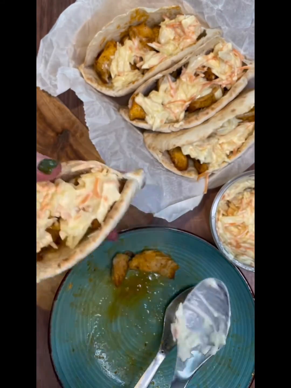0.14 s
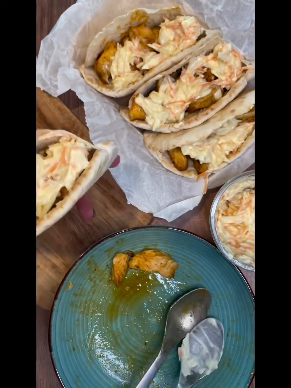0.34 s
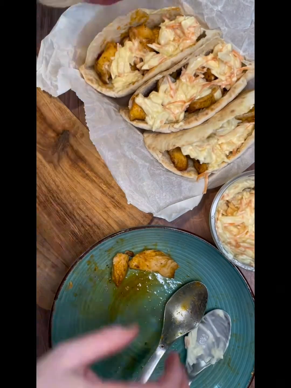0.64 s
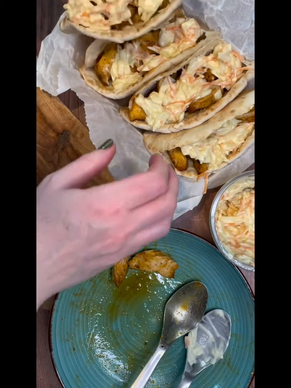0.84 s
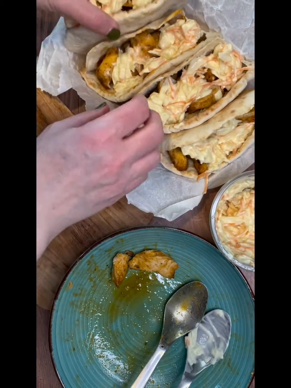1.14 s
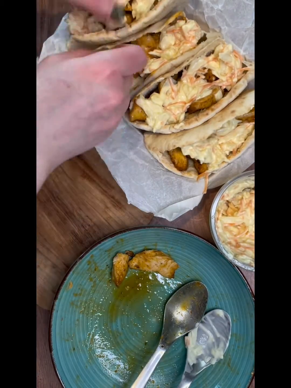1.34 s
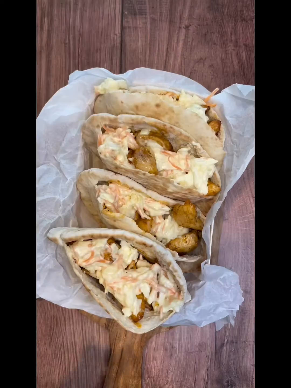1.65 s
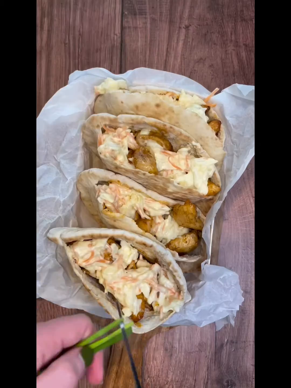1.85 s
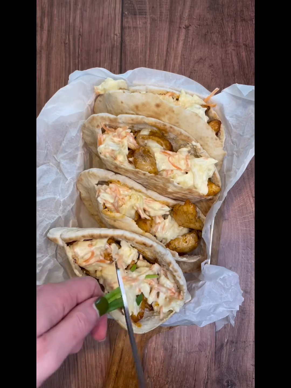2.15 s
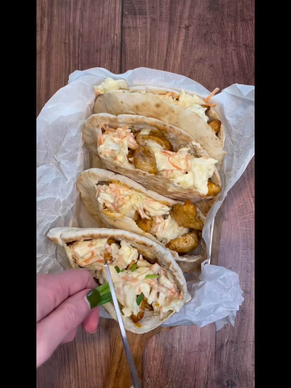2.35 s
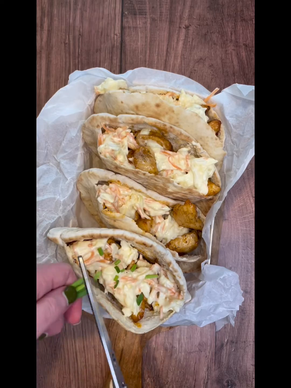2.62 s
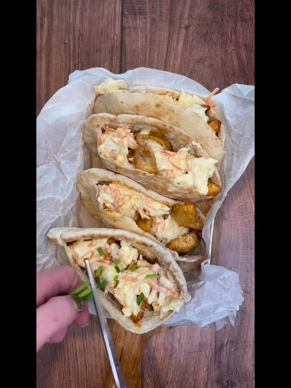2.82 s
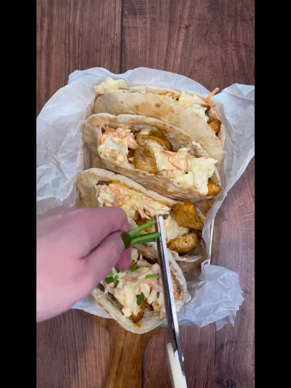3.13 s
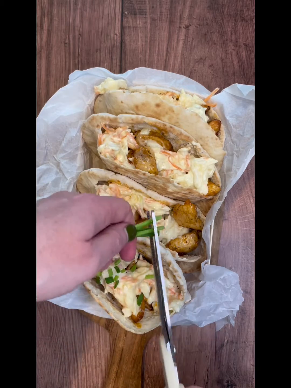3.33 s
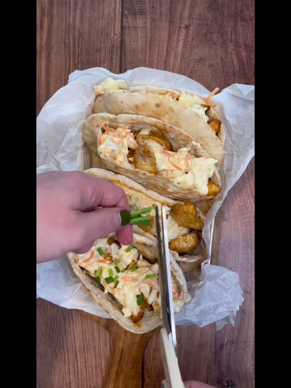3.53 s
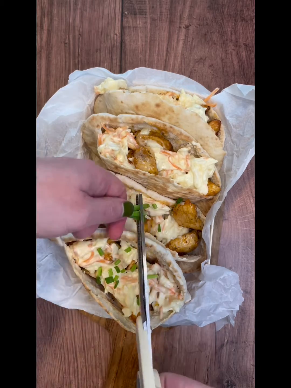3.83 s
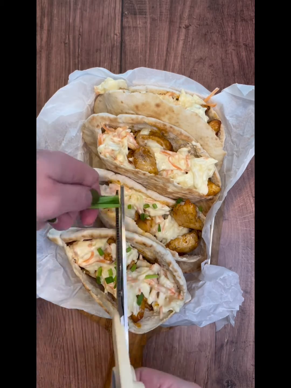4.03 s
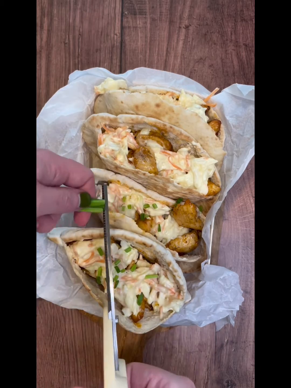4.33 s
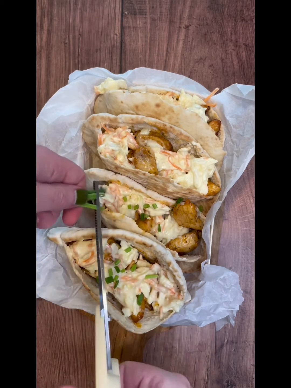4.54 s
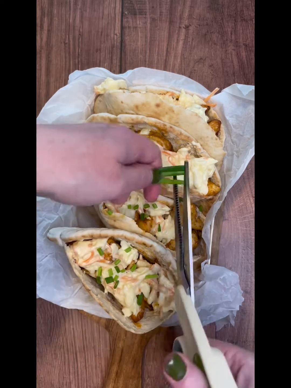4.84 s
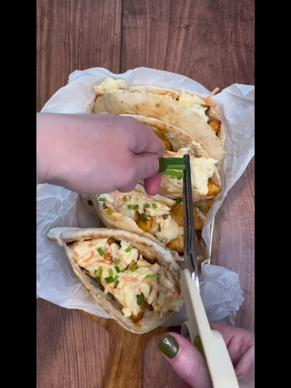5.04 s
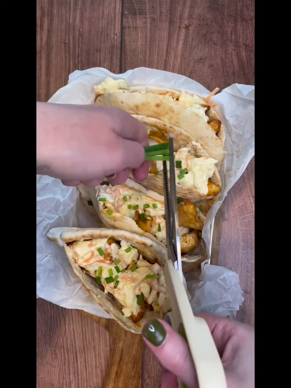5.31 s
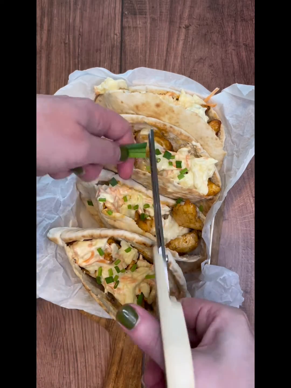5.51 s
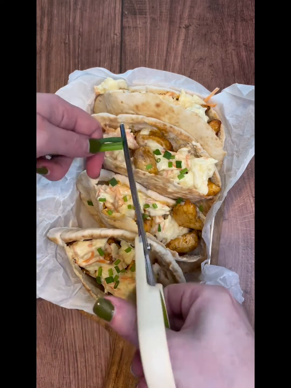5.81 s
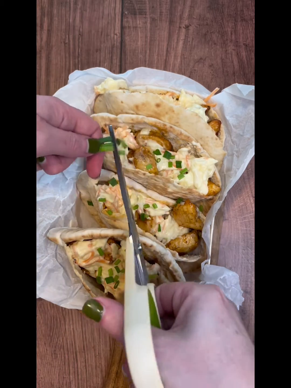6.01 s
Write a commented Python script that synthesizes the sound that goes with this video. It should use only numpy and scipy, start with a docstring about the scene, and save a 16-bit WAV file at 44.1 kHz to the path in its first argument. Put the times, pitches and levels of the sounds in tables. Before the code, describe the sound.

Close, dry stereo sound at a kitchen table. First comes a short double clink of spoon on plate, then small paper rustles and snapping creases, with light hiss behind. After a momentary drop in level, stems rustle almost inaudibly and scissors start snipping: thin blade slides, juicy little crunches, hard clacks at closure and faint dull handle knocks, irregularly spaced over quiet appliance hum.

```python
"""Kitchen table: a spoon is laid on a stoneware plate, a taco is tucked into baking paper.
The level dips briefly, chives rustle, then kitchen scissors snip them: blades slide, crunch, clack shut.
Friction is random slips, filtered for blades and paper, also driving decaying modes for ringing metal.
Sparse, shifting reflections answer; behind lie room air and appliance hum, early on a hiss and a drone."""
import sys
import numpy as np
from scipy import signal
from scipy.fft import rfft, irfft
from scipy.io import wavfile
from scipy.ndimage import uniform_filter1d

SR = 44100
rng = np.random.default_rng(int(sys.argv[2]) if len(sys.argv) > 2 else 0)


def bounce(signal):
    """Save signal as a 16-bit WAV file at the path given by the first command-line argument."""
    frames = np.transpose(np.atleast_2d(signal))
    limited = np.clip(frames, -1, 1)
    pcm = np.round(limited * 32767).astype(np.int16)
    wavfile.write(sys.argv[1], SR, pcm)


N = 272097
TIME_S = np.arange(N) / SR

# Event levels are before the mix gains in scene(); spectra are relative.
# Scissors close, louder snips bite more stems: start_s, length_s, level_db, rise_s, blade_ring_hz
SNIPS = [(1.994, 0.023, -51, 0.0094, 2270), (2.196, 0.01, -49.5, 0.0049, 2260),
         (2.381, 0.018, -46.5, 0.0072, 2340), (2.585, 0.014, -35, .008, 2420),
         (2.789, 0.022, -30, .005, 2430), (3.399, .021, -36, 0.0035, 2180),
         (3.632, 0.016, -29.5, 0.0063, 2180), (3.838, .011, -26.5, .005, 2220),
         (4.257, 0.019, -28.5, 0.0044, 2340), (4.503, 0.0067, -22, 0.0049, 2100),
         (4.964, .012, -47, 0.0043, 2100), (5.159, 0.014, -36, 0.0084, 2100),
         (5.405, 0.012, -33, .01, 2250), (5.737, 0.012, -42, 0.0059, 2230),
         (5.969, 0.018, -33, 0.0076, 2300)]
# Edge glides lightly on edge as the blades are lined up: start_s, length_s, level_db
GLIDES = [(2.748, 0.018, -67), (3.059, 0.077, -82.5), (3.368, .024, -62), (4.159, 0.03, -58),
          (4.194, 0.006, -48), (4.461, 0.034, -55), (4.81, 0.011, -77.5), (4.944, 0.019, -59.5),
          (5.592, .004, -73.5)]
# Blades catch or hit their stop: start_s, level_db, ring_hz
CLACKS = [(2.5956, -21, 2350), (3.4080, -31.5, 2320), (3.6495, -29.5, 2250), (3.8389, -31.5, 2250),
          (3.8570, -32, 2250), (4.2728, -25, 2270), (4.5200, -32, 2200), (5.1704, -21.5, 2210),
          (5.4106, -18, 2000), (5.9806, -19, 2040)]
# Scissors' distance, for partings and handle knocks: time_s, gain_db
NEARNESS = [(2.2, -3.5), (3.85, -2.5), (4.3, 4.5), (5.2, 0.5), (6.1, 2)]
# Spoon skids on the plate: start_s, length_s, level_db, rise_s, thud_share_db, treble_db
SKIDS = [(0.317, 0.021, -29.5, 0.0062, -20, 5.5), (0.3257, .0011, -18, 0.0019, -18, 1),
         (0.384, 0.017, -51, .004, 11, -10), (0.414, 0.033, -27.5, 0.0033, -9, -10)]
# Modes of spoon on stoneware: pitch_hz, level_db, t60_s
SPOON_MODES = [(303, -13.5, .1), (806, -15, .1), (980, -10.5, 0.14), (997, -19, 0.093), (2092, -2.5, 0.16),
               (2114, -7, .14), (3090, -7.5, 0.11), (4060, -9.5, .14), (4450, -10, 0.17), (5038, 4, 0.15),
               (4920, -9, .12), (6486, 3, .11), (7240, -20.5, .12), (8670, -4, 0.033), (9200, -19.5, .1),
               (10980, -10, .1), (11550, -15.5, 0.091)]
# Hand pushes the paper; the last four, faint rows are chives being handled: start_s, length_s, level_db
RUSTLES = [(0.752, 0.091, -47), (0.881, 0.071, -38.5), (1.015, .024, -43.5), (1.089, .01, -47),
           (1.14, 0.032, -47.5), (1.249, 0.015, -34), (1.453, 0.035, -58.5), (1.514, 0.0026, -39.5),
           (1.639, 0.0085, -55), (1.707, .005, -66.5), (1.802, 0.01, -73.5), (1.883, .019, -77)]
# Creases in the paper snap: start_s, level_db, treble_db
SNAPS = [(0.743, -45.5, -1), (.870, -38, -7), (0.9222, -30.5, -2.5), (1.021, -37.5, 9), (1.069, -45, -4.5),
         (1.128, -41.5, 3), (1.153, -35.5, -1.5), (1.189, -49, 11), (1.251, -32.5, 5), (1.342, -50, -9)]
# Soft knocks of a hand, the last as it squeezes the scissor handles: start_s, level_db
BUMPS = [(0.441, -45.5), (1.237, -82), (1.565, -52), (5.72, -56.5)]
# Stems being cut, spectrum: frequency_hz, level_db_per_hz
CRUNCH_SPECTRUM = [(180, -46.5), (300, -17), (1410, -23.5), (1640, -21.5), (2170, -2.5), (2650, -11),
                   (3130, -4), (3760, -12.5), (5080, -5), (5610, -7.5), (6740, -7.5), (9090, -16),
                   (10400, -7), (13500, -30), (16000, -32.5)]
# Edge sliding on edge, spectrum: frequency_hz, level_db_per_hz
SLIDE_SPECTRUM = [(410, -46.5), (700, -9.5), (946, -10), (1440, -15.5), (2240, -4.5), (2700, -7.5),
                  (4050, -5.5), (4920, 2.5), (7990, -8.5), (10700, -2), (14200, -20), (15200, -14.5),
                  (16000, -12)]
# Blade halves on their stop, spectrum: frequency_hz, level_db_per_hz
STOP_SPECTRUM = [(120, -49), (200, -15.5), (519, -16), (1320, -22), (2050, -6.5), (2330, -2), (2750, -7.5),
                 (3620, -1), (4040, -17), (5130, -1.5), (6400, -10), (6880, -7.5), (7830, -21), (10100, -7),
                 (16000, -40.5)]
# Spoon scraping over glaze, spectrum: frequency_hz, level_db_per_hz
SCRAPE_SPECTRUM = [(100, -28.5), (300, -7.5), (900, 1), (1700, 6.5), (2600, -0.5), (4500, 0), (7500, -11.5),
                   (9500, -1.5), (12000, -20.5), (15500, -18)]
# Shaken plate, spectrum: frequency_hz, level_db_per_hz
THUD_SPECTRUM = [(80, -23), (250, -2.5), (600, -9), (1000, -0.5), (1600, -5), (4000, -27.5)]
# Rustling paper and chives, spectrum: frequency_hz, level_db_per_hz
RUSTLE_SPECTRUM = [(180, -29.5), (300, -11.5), (494, -12), (565, -8.5), (1430, -5), (1660, -2.5),
                   (2930, -12), (5340, -11), (7320, -17.5), (10700, -14.5), (16000, -28.5)]
# Soft hand knock, spectrum: frequency_hz, level_db_per_hz
HAND_SPECTRUM = [(25, -13.5), (80, -1), (200, -1), (500, -14.5), (2000, -59.5)]
# Side against mid at two microphone ports, sliding blades: frequency_hz, side_db
BLADE_SIDE = [(500, -5), (2300, -7.5), (4000, 0), (5100, -13.5), (6300, 6), (7500, 6), (8600, 9),
              (9800, -4.5), (11000, -14), (14000, 7)]
# The same for clacks and handles: frequency_hz, side_db
STOP_SIDE = [(500, -13), (2300, -13), (4000, -8.5), (5100, -14), (6300, 7), (7500, 10.5), (8600, 5),
             (9800, -4), (11000, -16), (14000, 0)]
# The same for plate, rustles and soft hand knocks: frequency_hz, side_db
PLATE_SIDE = [(200, -16), (1000, -5), (3000, -2.5), (6500, -2.5), (8700, 1.5), (12000, -7)]
# Decay of the kitchen: frequency_hz, t60_s
KITCHEN_DECAY = [(250, 0.9), (1000, 0.24), (3000, 0.28), (7000, 0.29), (11000, 0.23), (16000, 0.071)]
# Colour of the reflections: frequency_hz, reflected_db
WALLS = [(250, -5), (1000, -0.5), (2200, -3.5), (3300, 3.5), (5500, -1.5), (7400, -6.5), (9000, -3),
         (15000, 2)]
# Left-right likeness of the background: frequency_hz, likeness (0 to 1)
LIKENESS = [(60, 0.87), (130, 0.94), (260, .3), (500, 0.15), (2000, 0.11), (16000, .1)]
# Room air, spectrum: frequency_hz, level_db_per_hz
AIR_SPECTRUM = [(15, -56.5), (25, -25.5), (117, -2), (212, -4.5), (277, -12), (439, -13.5), (714, -33.5),
                (1520, -37.5), (1790, -55), (1940, -45.5), (4250, -47.5), (5730, -46.5), (7110, -69),
                (7920, -63), (16000, -60.5)]
# Low room resonances stirred by the appliance: pitch_hz, level_db, width_hz
ROOM_RESONANCES = [(140.8, -69, 15), (185.5, -67, 60), (346, -73.5, 8.9)]
# Early hiss, spectrum: frequency_hz, level_db_per_hz
HISS_SPECTRUM = [(320, -31), (550, -3), (914, -1), (1400, -11.5), (1650, -7), (2780, -13), (3740, -10.5),
                 (4560, -15), (5330, -12), (11400, -18.5), (16000, -13)]
# Course of hiss and whistles: time_s, gain_db
HISS_FADE = [(0, -2), (.28, 4.5), (.65, -5.5), (1.4, -9.5), (1.52, -10), (1.56, -47)]
# Faint whistles in the hiss, before the fade: pitch_hz, level_db, width_hz
WHISTLES = [(1701, -75.5, 90), (3600, -73, 180)]
# Course of the deep drone: time_s, gain_db
DRONE_FADE = [(0, -54), (.45, -54.5), (.6, -61), (.72, -53.5), (1.0, -53.5), (1.03, -92), (1.5, -100)]

CUT_RING_DB, CLACK_RING_DB = -11, -9.5
GLIDE_RISE_S, GLIDE_RING_HZ, GLIDE_RING_DB = 0.0076, 2260, -17.5
REVERSE_S = .054  # end of a snip to the parting of the blades
PART_LENGTH_S, PART_RISE_S, PART_RING_DB = 0.0036, 0.013, -0.5
PART_RELATIVE_DB, PART_MAX_DB = -0.5, -49  # against the snip; ceiling before nearness
KNOCK_DB, SQUEEZE_DB = -63, -1.5  # squeeze knock is relative to pull knock
RUSTLE_RISE_S = .007
TREBLE_FROM_HZ, TREBLE_FULL_HZ = 5500, 11500
AIR_DB, AIR_EARLY_DB = -61, -2.5  # air is fainter before the dip
WAVER_DB, WAVER_S = 1.2, .12
HUM_HZ, HUM_DB, HUM_LAG_RAD = 437, -69, 0.35
HISS_DB = -59.5  # before the fade
DRONE_HZ = 46.8
DIP_S, EDGE_HZ = 1.538, 16100


def blades(ring_t60_s=0.0072, light_db=-50, hard_db=-35):
    """Edge slides on edge until the force is high enough to burst stems; the blades ring briefly."""
    out = np.zeros((2, N))
    strokes = [(*snip, CUT_RING_DB) for snip in SNIPS]
    strokes += [(*glide, GLIDE_RISE_S, GLIDE_RING_HZ, GLIDE_RING_DB) for glide in GLIDES]
    strokes += [(s, PART_LENGTH_S, db, PART_RISE_S, hz, PART_RING_DB) for s, db, hz in partings()]
    for start_s, length_s, db, rise_s, hz, ring_db in strokes:
        lead_s, slips = friction(length_s, rise_s, per_s=6000, spread_db=4.5, release_s=0.0043, clump_db=0.94)
        rise_time_s = np.minimum(TIME_S[:len(slips)] - lead_s, 0)
        force_db = db + 20 * np.log10(np.e) * rise_time_s / rise_s
        bite = np.interp(force_db, [light_db, hard_db], [0, 1])  # share of stem crunch
        crunch = evened(colour(slips, CRUNCH_SPECTRUM))
        slide = evened(colour(slips, SLIDE_SPECTRUM))
        rasp = bite * crunch + (1 - bite) * slide
        ringing = spread(ring(rasp, hz, ring_t60_s), length_s)
        stroke = spread(rasp, length_s) + gain_of(ring_db) * ringing
        add(out, start_s - lead_s, gain_of(db) * ports(stroke, BLADE_SIDE, echo_db=-11))
    return out


def partings():
    """The hand reverses after each snip and the blades part: start_s, level_db, ring_hz."""
    parts = []
    for snip_s, length_s, snip_db, _, ring_hz in SNIPS:
        start_s = snip_s + length_s + REVERSE_S
        level_db = min(snip_db + PART_RELATIVE_DB, PART_MAX_DB)
        parts.append((start_s, level_db + nearness_db(snip_s), ring_hz))
    return parts


def nearness_db(time_s):
    """Gain of the scissors from their distance."""
    return np.interp(time_s, *np.transpose(NEARNESS))


def clacks(contact_s=0.0019, release_s=.0016, ring_t60_s=0.018):
    """The halves chatter against their stop for a few milliseconds, damped by the hand."""
    out, t = np.zeros((2, N)), np.arange(SR // 20) / SR
    for start_s, db, hz in CLACKS:
        decay_db = -5 * t / contact_s - 20 * np.maximum(t - contact_s, 0) / release_s
        chatter = rng.choice([-1, 1], len(t)) * gain_of(decay_db)
        knock = colour(chatter, STOP_SPECTRUM)
        ringing = spread(ring(knock, hz, ring_t60_s), contact_s)
        clack = spread(knock, contact_s) + gain_of(CLACK_RING_DB) * ringing
        add(out, start_s, gain_of(db) * ports(clack, STOP_SIDE, echo_db=-11))
    return out


def handles(decay_s=0.007, ring_hz=940):
    """Plastic handles knock dully, as one damped mode, when fingers squeeze or pull them apart."""
    out, t = np.zeros((2, N)), np.arange(SR // 10) / SR
    squeezes = [(snip[0], SQUEEZE_DB) for snip in SNIPS]
    pulls = [(parting[0], 0) for parting in partings()]
    for start_s, db in squeezes + pulls:
        touch = rng.standard_normal(len(t)) * np.exp(-t / decay_s)
        tap = spread(ring(touch, ring_hz, t60=.01), decay_s)
        level_db = KNOCK_DB + db + 2 * nearness_db(start_s)  # handles swing in twice as far as blades
        add(out, start_s, gain_of(level_db) * ports(tap, STOP_SIDE, echo_db=-10))
    return out


def spoon(scrape_db=-8.0, ring_db=-5, free_db=-5, detune=0.01, pressed=.4):
    """Spoon chatters over glaze and shakes the plate; contact damps and detunes most of its ring."""
    out = np.zeros((2, N))
    for start_s, length_s, db, rise_s, thud_db, treble_db in SKIDS:
        lead_s, slips = friction(length_s, rise_s, per_s=3600, spread_db=0.5, release_s=0.0035, clump_db=0.0)
        damped, free = 0, 0
        for hz, mode_db, t60 in SPOON_MODES:
            pressed_hz = hz * (1 + detune * rng.uniform(-0.84, 1))
            damped += gain_of(mode_db) * spread(ring(slips, pressed_hz, pressed * t60), length_s)
            free += gain_of(mode_db) * spread(ring(slips, hz, t60), length_s)
        scrape = spread(colour(slips, SCRAPE_SPECTRUM), length_s)
        thud = spread(colour(slips, THUD_SPECTRUM), length_s)
        metal = gain_of(ring_db) * (damped + gain_of(free_db) * free) / (1 + gain_of(free_db))
        clink = brighten(metal + gain_of(scrape_db) * scrape + gain_of(thud_db) * thud, treble_db)
        stereo = ports(clink, PLATE_SIDE, echo_db=-11.5)[::-1]  # the spoon lies to the right
        add(out, start_s - lead_s, gain_of(db) * stereo)
    return out


def rustles(snap_s=0.004):
    """Paper, then faintly chives, crackle in tiny slips; creases in the paper snap as noise bursts."""
    out, t = np.zeros((2, N)), np.arange(SR // 20) / SR
    for start_s, length_s, db in RUSTLES:
        lead_s, slips = friction(length_s, RUSTLE_RISE_S, per_s=2500, spread_db=2.0, release_s=0.014, clump_db=2.0)
        crackle = spread(colour(slips, RUSTLE_SPECTRUM), length_s)
        add(out, start_s - lead_s, gain_of(db) * ports(crackle, PLATE_SIDE, echo_db=-9.5))
    for start_s, db, treble_db in SNAPS:
        burst = rng.standard_normal(len(t)) * gain_of(-14 * t / snap_s)
        snap = spread(brighten(colour(burst, RUSTLE_SPECTRUM), treble_db), snap_s)
        add(out, start_s, gain_of(db) * ports(snap, PLATE_SIDE, echo_db=2.5))
    return out


def bumps(decay_s=0.041):
    """Dull soft knocks of a hand, the last as it squeezes the scissor handles: decaying low noise."""
    out, t = np.zeros((2, N)), np.arange(SR // 4) / SR
    for start_s, db in BUMPS:
        knock = colour(rng.standard_normal(len(t)) * np.exp(-t / decay_s), HAND_SPECTRUM)
        add(out, start_s, gain_of(db) * ports(spread(knock, decay_s), PLATE_SIDE, echo_db=-14.0))
    return out


def shifting_room(x, count=4, step_s=.21):
    """Hands move, so sounds pass through a slowly changing set of reflections: crossfaded rooms."""
    place = TIME_S / step_s
    out = 0
    for k in range(count):
        share = np.maximum(1 - abs((place - k + 1) % count - 1), 0)
        out = out + kitchen(x * np.sqrt(share))
    return out


def kitchen(x, first_s=0.0055, build_s=0.0031):
    """Sparse reflections that thicken quickly and die band by band."""
    count = SR // 2
    taps = rng.choice([-1., 1.], (2, count)) * (rng.random((2, count)) < 5000 / SR)
    taps *= np.clip((TIME_S[:count] - first_s) / build_s, 0, 1)
    hz, t, bands = signal.stft(taps, SR, nperseg=256)
    decay_db = read(WALLS, hz)[:, None] - 60 * t / read(KITCHEN_DECAY, hz)[:, None]
    tail = signal.istft(bands * gain_of(decay_db), SR)[1]
    return signal.fftconvolve(x, tail / np.linalg.norm(tail[0]), axes=1)[:, :N]


def background():
    """Room air, stirred resonances and appliance hum; at first also a hiss and a deep drone."""
    lag_rad = np.array([[0], [HUM_LAG_RAD]])
    hum = gain_of(HUM_DB) * np.sqrt(2) * np.sin(2 * np.pi * HUM_HZ * TIME_S - lag_rad)
    murk = sum(gain_of(db) * tone(hz, width_hz) for hz, db, width_hz in ROOM_RESONANCES)
    hiss = gain_of(HISS_DB) * diffuse(lambda f: read(HISS_SPECTRUM, f))
    hiss = hiss + sum(gain_of(db) * tone(hz, width_hz) for hz, db, width_hz in WHISTLES)
    hiss = hiss[0] * gain_of(np.interp(TIME_S, *np.transpose(HISS_FADE)))  # same in both ears
    deep = np.sqrt(2) * np.sin(2 * np.pi * DRONE_HZ * TIME_S) + .7 * tone(hz=50.03, width_hz=75)[0]
    drone = gain_of(np.interp(TIME_S, *np.transpose(DRONE_FADE))) * deep
    air_db = AIR_DB + AIR_EARLY_DB * (TIME_S < DIP_S)
    air = gain_of(air_db) * diffuse(lambda f: read(AIR_SPECTRUM, f))
    return (air + murk) * waver() + hum + hiss + drone


def waver():
    """Slow random gain: lowpassed noise in decibels."""
    hz = np.fft.rfftfreq(N, 1 / SR)
    slow = irfft(rfft(rng.standard_normal(N)) * np.exp(-(hz * WAVER_S) ** 2), N)
    return gain_of(WAVER_DB * evened(slow))


def tone(hz, width_hz):
    """Narrow, wavering band of room noise."""
    return diffuse(lambda f: -20 * np.log10(1 + (2 * (f - hz) / width_hz) ** 2))


def diffuse(level_db):
    """Steady room noise of spectrum level_db(hz), alike in both ears mainly in the bass."""
    hz = np.fft.rfftfreq(N, 1 / SR)
    a, b = rfft(rng.standard_normal((2, N)))
    same = np.clip(read(LIKENESS, hz), -1, 1)
    pair = np.array([a, same * a + np.sqrt(1 - same ** 2) * b])
    return evened(irfft(pair * gain_of(level_db(hz)), N))


def friction(length_s, rise_s, per_s, spread_db, release_s, clump_db):
    """Tiny slips that build up, clump and stop; returns lead time in s and the slips."""
    lead_s = 6 * rise_s
    t = np.arange(SR // 2) / SR - lead_s
    force = np.exp(np.minimum(t, 0) / rise_s - np.maximum(t - length_s, 0) / release_s)
    clumps = gain_of(clump_db * evened(uniform_filter1d(rng.standard_normal(len(t)), size=160)))
    size = gain_of(spread_db * np.minimum(rng.exponential(1, len(t)), 3))
    size = size * rng.choice([-1, 1], len(t))
    happens = rng.random(len(t)) < per_s / SR
    return lead_s, force * clumps * size * happens


def ring(x, hz, t60):
    """One decaying mode, t60 in s."""
    pole = np.exp((2j * np.pi * hz - np.log(1000) / t60) / SR)
    return signal.lfilter([1], [1, -pole], x).real


def colour(x, spectrum, size=2048):
    """Causal minimum-phase filter with the given spectrum."""
    level_db = np.maximum(read(spectrum, abs(np.fft.fftfreq(size, 1 / SR))), -100)
    log_gain = np.log(gain_of(level_db))
    taps = np.fft.ifft(np.exp(np.conj(signal.hilbert(log_gain)))).real
    return signal.fftconvolve(x, taps[:size // 2])[:len(x)]


def brighten(x, treble_db):
    """Lifts or lowers the top of the spectrum."""
    return colour(x, [(TREBLE_FROM_HZ, 0), (TREBLE_FULL_HZ, treble_db)])


def ports(x, side_db, echo_db, echo_delay_s=0.0013):
    """Two microphone ports, difference a quarter cycle ahead of sum; each gets a table-top echo."""
    hz = np.fft.rfftfreq(len(x), 1 / SR)
    side = 1j * gain_of(read(side_db, hz)) * np.array([[1], [-1]])
    delay_s = echo_delay_s * rng.uniform(.4, 1.6, (2, 1))  # the path changes as the hands move
    echo = gain_of(echo_db) * np.exp(-2j * np.pi * hz * delay_s)
    return irfft(rfft(x) * (1 + side + echo), len(x))


def gain_of(db):
    """Decibels to amplitude."""
    return 10 ** (np.asarray(db) / 20)


def evened(x):
    """Scales to an rms of one."""
    return x / np.sqrt(np.mean(x ** 2) + 1e-20)


def spread(x, length_s):
    """Scales to the energy of a sound of rms one lasting length_s."""
    return x * np.sqrt(length_s * SR / (np.sum(x ** 2) + 1e-20))


def read(points, hz):
    """Reads a table along a log-frequency axis."""
    f, value = np.transpose(points)
    return np.interp(np.log(hz + 1), np.log(f + 1), value)


def add(mix, start_s, sound):
    """Mixes a stereo sound in at start_s."""
    part = mix[:, max(round(start_s * SR), 0):][:, :sound.shape[1]]
    part += sound[:, :part.shape[1]]


def scene():
    """Scissors close to the microphone, plate and paper on the table, all in the kitchen."""
    cut = blades() + handles()
    shut = clacks()
    handling = spoon() + rustles() + bumps()
    direct = gain_of(-2.5) * cut + gain_of(-1) * shut + gain_of(-2.5) * handling
    to_room = gain_of(-12.5) * cut + gain_of(-18.0) * shut + gain_of(-13.0) * handling
    return direct + shifting_room(to_room) + background()


def record(dry):
    """The level dips briefly; then a lowpass limits the band."""
    dip_db = np.interp(TIME_S - DIP_S, [-.017, -.014, .013, .018], [0, -30, -30, 0])
    lowpass = signal.firwin(511, EDGE_HZ, window=("kaiser", 9), fs=SR)
    return signal.oaconvolve(dry * gain_of(dip_db), lowpass[None], "same")


dry = scene()
out = record(dry)
bounce(out)
```